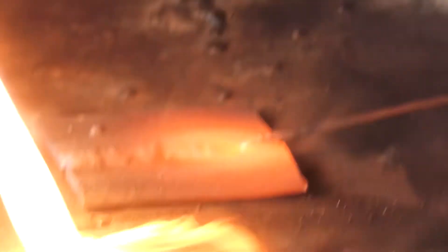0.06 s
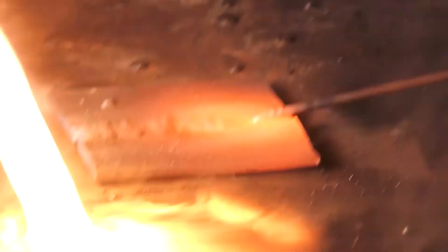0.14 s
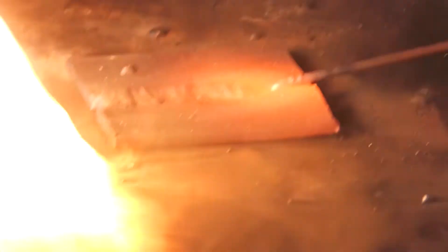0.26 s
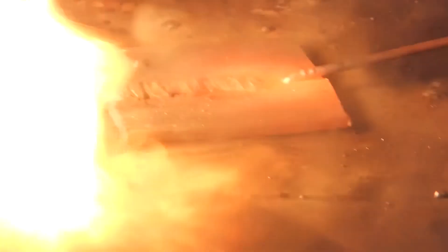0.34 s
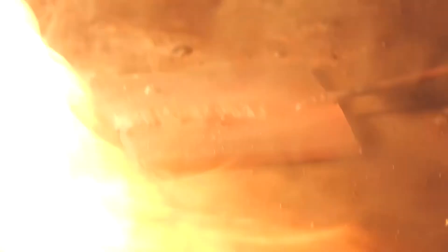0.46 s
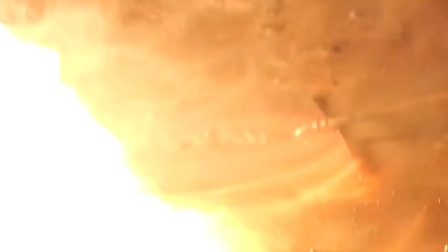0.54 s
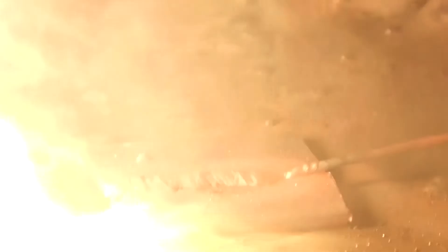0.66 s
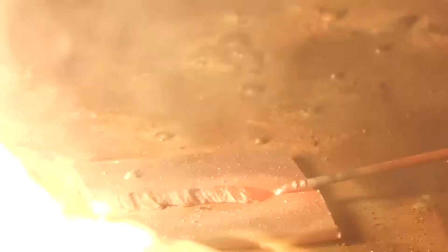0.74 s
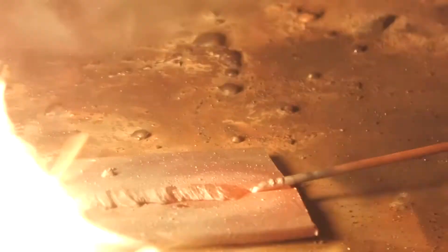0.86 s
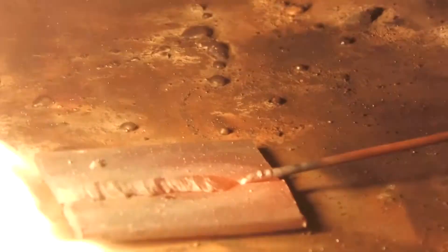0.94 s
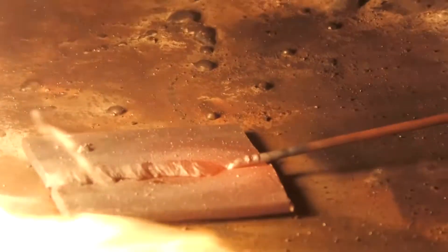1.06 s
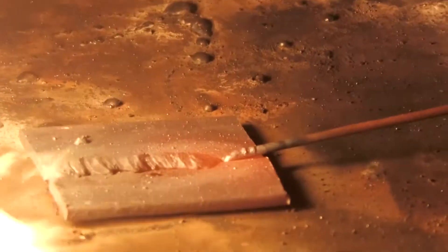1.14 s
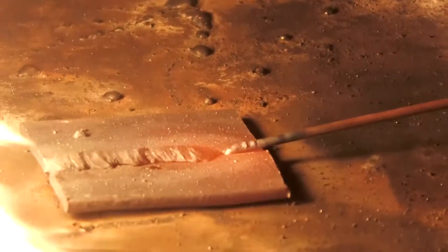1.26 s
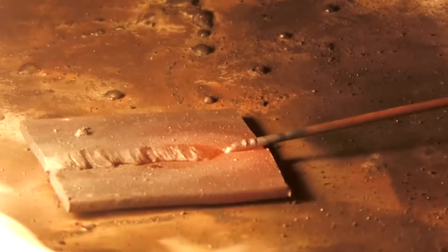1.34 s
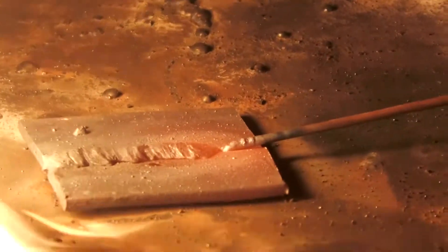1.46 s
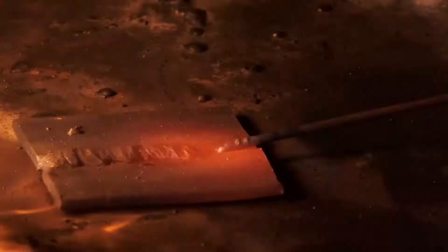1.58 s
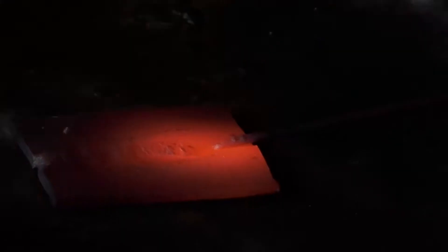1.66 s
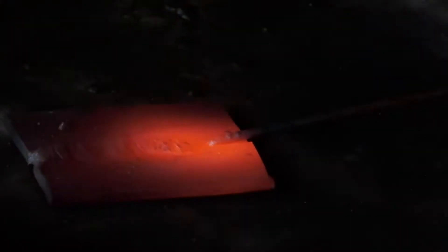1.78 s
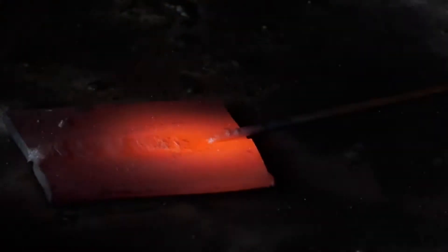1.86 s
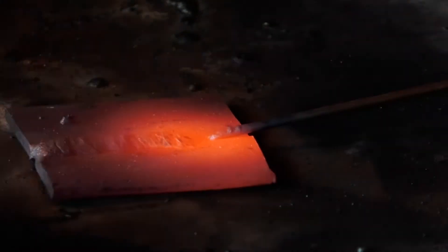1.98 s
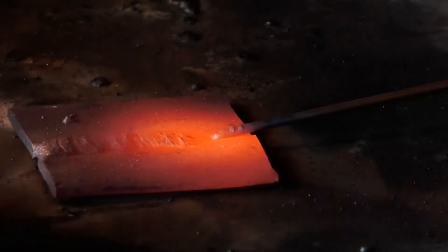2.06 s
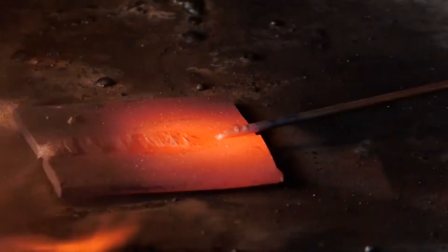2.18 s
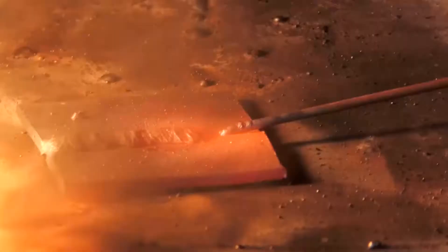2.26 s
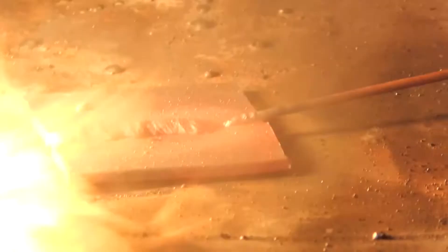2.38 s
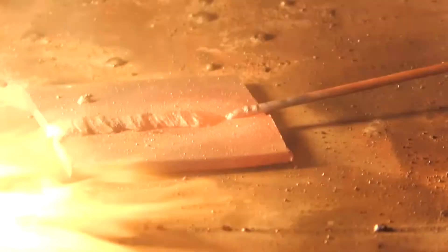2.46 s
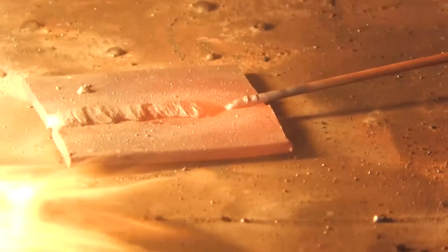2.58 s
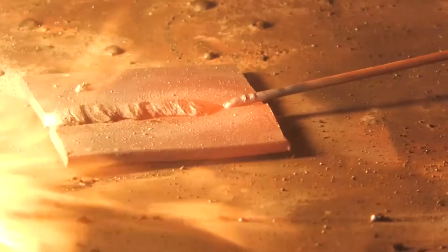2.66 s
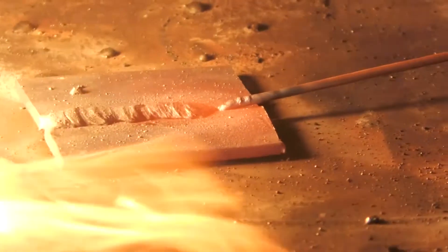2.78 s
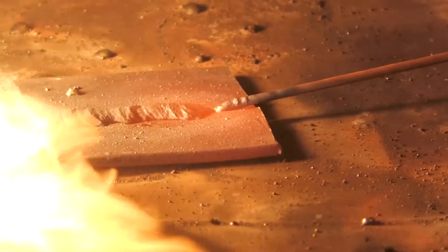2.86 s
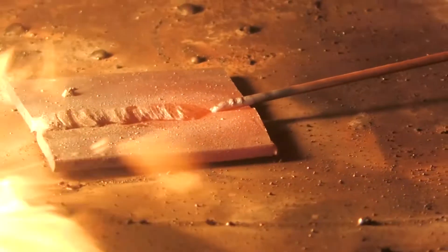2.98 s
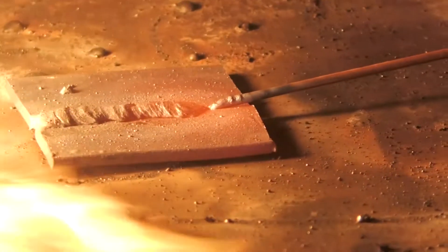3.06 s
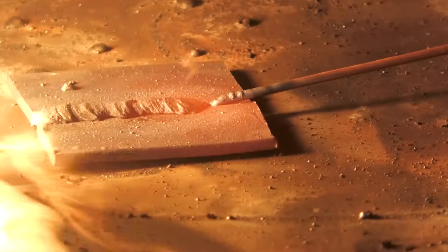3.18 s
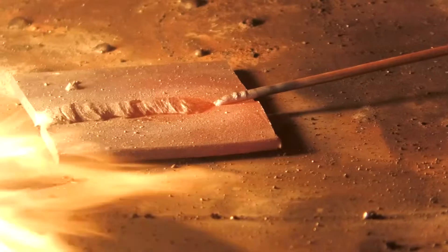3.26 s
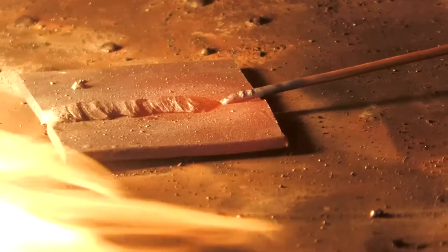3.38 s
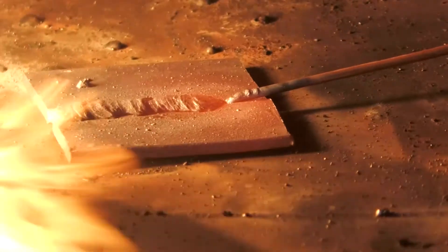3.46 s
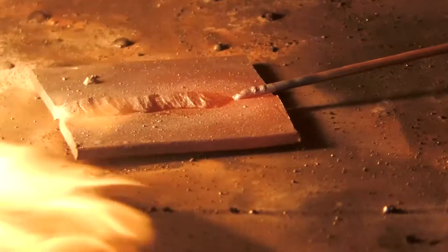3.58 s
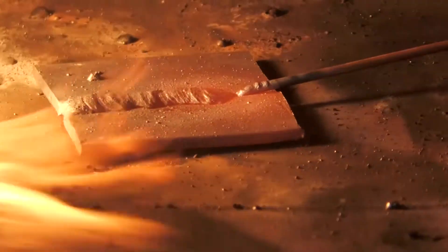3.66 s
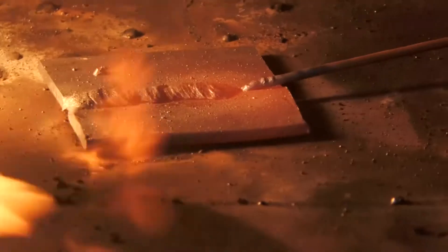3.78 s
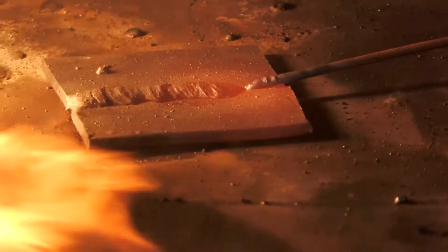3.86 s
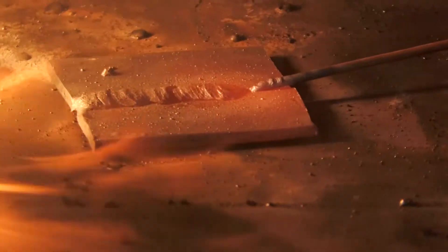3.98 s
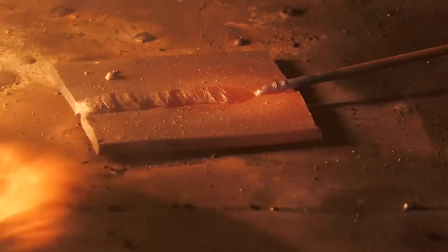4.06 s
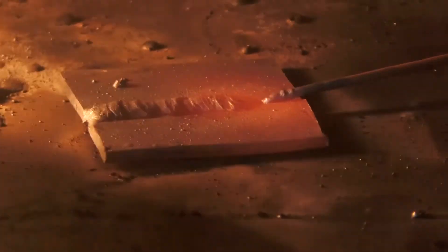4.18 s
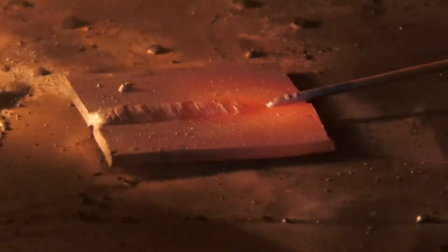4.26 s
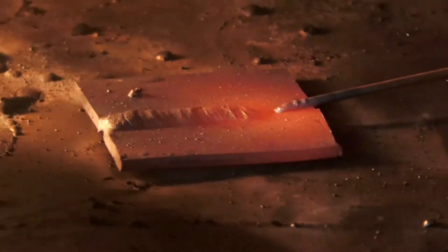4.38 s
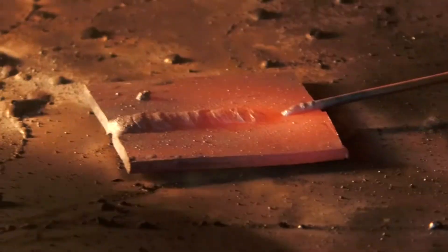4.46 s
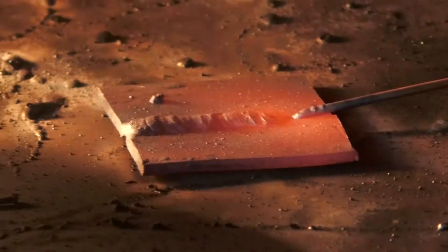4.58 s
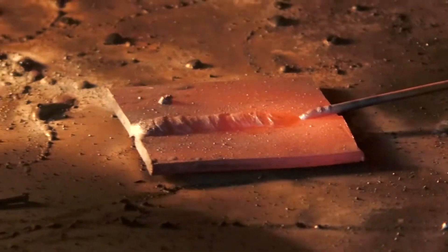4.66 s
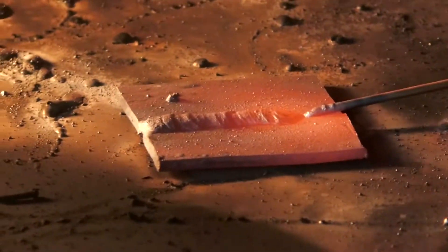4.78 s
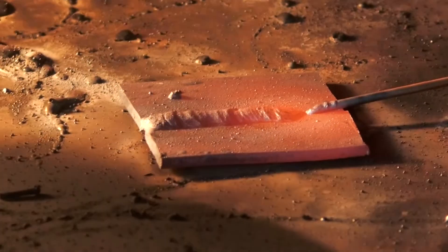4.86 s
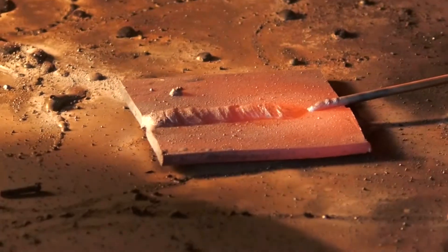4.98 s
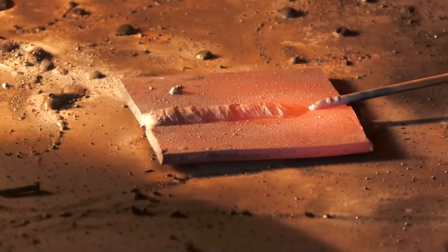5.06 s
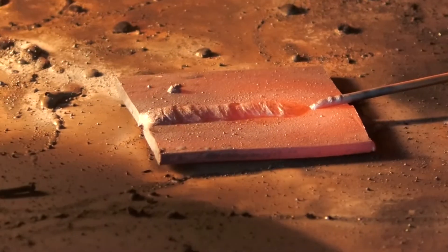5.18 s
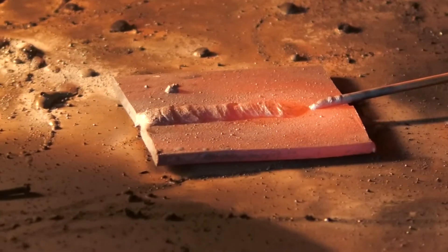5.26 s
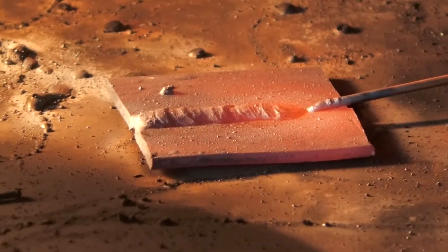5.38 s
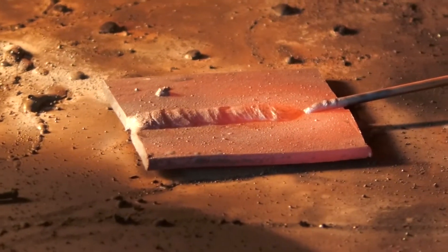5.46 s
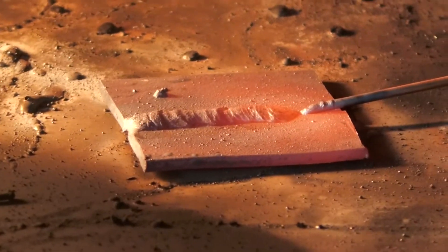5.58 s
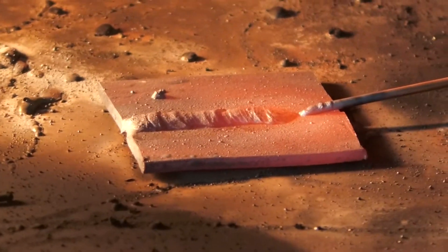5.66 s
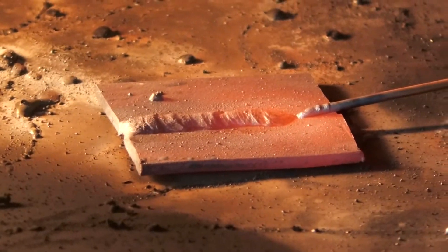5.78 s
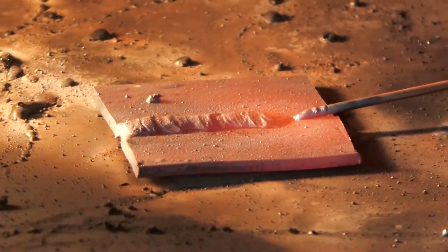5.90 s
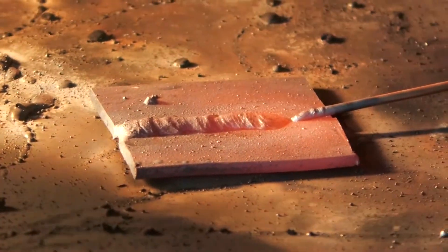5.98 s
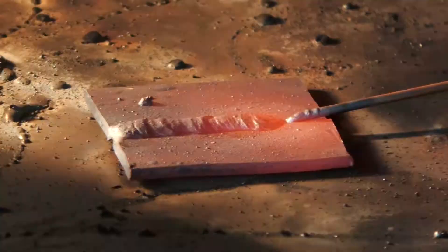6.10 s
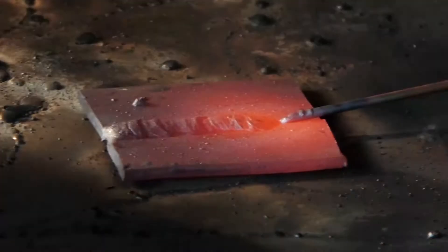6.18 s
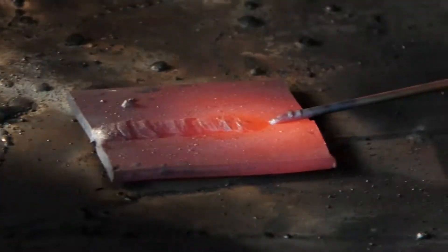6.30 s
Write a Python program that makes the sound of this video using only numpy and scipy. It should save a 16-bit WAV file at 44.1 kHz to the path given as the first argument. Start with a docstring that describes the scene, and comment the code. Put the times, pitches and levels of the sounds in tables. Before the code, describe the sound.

A welding torch is heard close up over a workbench, with only a very faint workshop murmur behind it. At first gas leaks with a soft, thin hiss. From about 0.5 to 0.7 seconds it catches with several quick pops and flares into a loud, fluttering roar with a strong hiss, briefly overloading the microphone. Around 1.6 seconds the valve is shut and the sound fades, nearly silent by 2.2 seconds. At about 2.4 seconds the torch relights with more pops and burns loudly and unevenly, with hollow puffs and a rasp. The flame eases a little toward 4 seconds, then surges once more at 4.5 seconds. Right after that the roar dies away as the flame tightens. A steady bright hiss remains, with a few faint flutters, growing slightly louder at 6 seconds and lasting to the end at about 6.3 seconds.

```python
"""Gas leaks softly from a welding torch, close by, over a small steel plate on a workbench.
The valve is opened, shut and opened again: eddies at the nozzle hiss, the gas catches with pops,
and a big yellow flame burns unevenly, roaring and fluttering. Oxygen draws it into a tight cone:
the roar dies and a steady bright hiss remains. The loudest stretches overload the microphone."""
import sys
import numpy as np
from scipy.fft import rfft, irfft, next_fast_len
from scipy.io import wavfile

SR = 44100
rng = np.random.default_rng(int(sys.argv[2]) if len(sys.argv) > 2 else 0)


def transcribe(u):
    """Save the signal u as a 16-bit wav file named by the first command-line argument.

    u: samples, shape (n,) or (channels, n), limited to [-1, 1]; the rate is SR.
    q: integer samples, one column per channel.
    """
    v = np.clip(np.atleast_2d(u).T, -1, 1)
    q = np.round(v * 32767).astype(np.int16)
    wavfile.write(sys.argv[1], SR, q)


N = 279153

# burning gas, one curve per burn: (time [s], roar [dB], rasp [dB])
FIRST_BURN = [(.38, -69, -102), (.54, -33.5, -42), (.63, -23.5, -28.5), (.68, -12.5, -17.5),
              (.73, -17, -18), (.87, -18, -23), (1.08, -21, -20), (1.52, -19, -19.5), (1.67, -30.5, -26),
              (1.9, -76, -45), (2.15, -71, -71)]
SECOND_BURN = [(2.29, -74.5, -74.5), (2.37, -43.5, -62), (2.46, -15.5, -23), (2.7, -16.5, -21),
               (2.92, -23, -25.5), (3.22, -20.5, -23), (3.75, -26, -27.5), (4.03, -28.5, -33),
               (4.38, -21, -35), (4.5, -15.5, -27.5), (4.65, -38, -43.5), (5.2, -51.5, -46),
               (6.33, -55.5, -59)]


def from_db(db):
    """Decibels to gain."""
    return 10 ** (np.asarray(db) / 20)


def rms_one(x):
    """Scale to unit power."""
    return x / np.sqrt(np.mean(x ** 2) + 1e-20)


def in_time(rows):
    """Each column of a time curve, per sample."""
    times_s, *columns = np.transpose(rows)
    return [np.interp(np.arange(N) / SR, times_s, column) for column in columns]


def bins_hz():
    """Frequencies of the filter grid."""
    size = next_fast_len(N, True)
    return np.arange(size // 2 + 1) * SR / size


def at_hz(points):
    """Table interpolated over log frequency onto the filter grid."""
    hz, value = np.transpose(points)
    return np.interp(np.log(bins_hz() + 1), np.log(hz), value)


def filtered(x, response):
    """Apply a frequency response."""
    size = next_fast_len(N, True)
    return irfft(rfft(x, size) * response, size)[..., :N]


def colour(points):
    """Gain of a spectrum table, falling 12 dB/octave beyond its ends."""
    hz = bins_hz() + 1
    low_skirt = np.minimum(1, hz / points[0][0]) ** 2
    high_skirt = np.minimum(1, points[-1][0] / hz) ** 2
    return from_db(at_hz(points)) * low_skirt * high_skirt


def resonance(hz, width_hz):
    """Response of one mode, peak gain 1."""
    f = bins_hz() + 1
    return 1 / (1 + 1j * (f * f - hz * hz) / (f * width_hz))


def below(hz):
    """Steep low-pass gain."""
    return 1 / np.sqrt(1 + (bins_hz() / hz) ** 16)


def above(hz):
    """Matching high-pass gain."""
    return np.sqrt(1 - below(hz) ** 2)


def drift(rate_hz):
    """Smooth random wander, rms 1."""
    return rms_one(filtered(rng.standard_normal(N), 1 / (1 + (bins_hz() / rate_hz) ** 2)))


def turbulence(response):
    """Coloured noise, partly alike at two microphones; rms 1."""
    # left-right likeness: (frequency [Hz], correlation [0-1])
    likeness = [(40, .6), (150, 0.7), (300, .82), (600, 0.92), (1100, .87), (2200, 0.9), (4000, .972),
                (6000, 0.99), (7800, 0.94), (9500, 0.58), (12000, .78)]
    alike = np.clip(at_hz(likeness), 0, 1)
    mid = filtered(rng.standard_normal(N), response * np.sqrt(1 + alike))
    side = filtered(rng.standard_normal(N), response * np.sqrt(1 - alike))
    return rms_one(mid + side * np.array([[1], [-1]]))


def reflections(t60_s, wet_db, count=40):
    """Response of bench, tools and walls: short echoes ripple the treble."""
    delays_s = rng.uniform(0.006, 0.07, count)
    taps = np.zeros(N)
    taps[(delays_s * SR).astype(int)] = from_db(-60 * delays_s / t60_s) * rng.choice([-1, 1], count)
    echoes = rfft(taps / np.sqrt(np.sum(taps ** 2)), next_fast_len(N, True))
    wet = from_db(wet_db) * bins_hz() / (bins_hz() + 900)   # small objects scatter only short waves
    return (1 + wet * echoes) / np.sqrt(1 + wet ** 2)


def workbench():
    """Response of the standing waves and echoes around plate and bench."""
    # standing waves: (frequency [Hz], width [Hz], lift [dB])
    modes = [(527, 25, -1), (775, 10, 3.5), (1450, 9.6, 3.5), (2400, 15, 3), (2520, 25, 4.5), (2787, 27, 1),
             (2995, 60, 2.5), (3800, 13, 3), (3870, 19, 2), (4450, 44, 1), (4890, 13, 1), (5240, 21, 1),
             (5459, 25, 0.5)]
    lift = sum((from_db(db) - 1) * resonance(hz, width_hz) for hz, width_hz, db in modes)
    return (1 + lift) * reflections(t60_s=0.14, wet_db=-4)


def seep(space, level_db=-50, fade_from_s=0.39, fade_db_per_s=65, airy_db=-45.5, airy_db_per_s=58):
    """The nearly shut valve hisses, with a faint high whistle and an airy lower one; all fade."""
    # leak spectrum: (frequency [Hz], density [dB])
    leak_spectrum = [(2800, -46.5), (3700, -19), (3900, -5.5), (4750, -8), (4900, -1), (5900, 3.5),
                     (6300, -3), (7600, -0.5), (8100, -9), (11500, -10), (13000, -28)]
    t = np.arange(N) / SR
    hiss = turbulence(colour(leak_spectrum) * space)
    high_whistle = turbulence(resonance(hz=11100, width_hz=150) ** 2) * from_db(-25)
    airy_whistle = turbulence(resonance(hz=5200, width_hz=600) ** 2)
    leak = from_db(level_db - fade_db_per_s * np.maximum(t - fade_from_s, 0))
    return (hiss + high_whistle) * leak + airy_whistle * from_db(airy_db - airy_db_per_s * t)


def shop(level_db=-66):
    """Faint, steady murmur of the workshop."""
    # room noise: (frequency [Hz], density [dB])
    room_spectrum = [(25, -13.5), (70, -2.5), (170, 2), (300, 3), (450, -2), (700, -14.5), (1100, -17.5),
                     (2000, -13.5), (8000, -30)]
    return turbulence(colour(room_spectrum)) * from_db(level_db)


def puffs(small_puffs, trim_db=-1, waver=0.07, ragged_db=1.94):
    """Each puff of the plume is a hollow, ragged note that swells and fades as its pitch wavers."""
    # big puffs of the loose flame: (time [s], pitch [Hz], level [dB], length [s])
    big_puffs = [(0.133, 257, -56, .04), (0.337, 170, -50.5, .055), (0.502, 282, -33, 0.048),
                 (0.621, 150, -25, .04), (0.679, 181.4, -16.5, 0.027), (0.711, 276.9, -22.5, 0.13),
                 (0.934, 275, -25.5, 0.065), (1.281, 151, -30.5, 0.048), (1.363, 154, -26, 0.036),
                 (1.604, 158.4, -31.5, .04), (1.668, 420, -31, .04), (2.3, 47.6, -47.5, .032),
                 (2.408, 275.6, -27, 0.046), (2.508, 277, -19, 0.075), (2.618, 203.4, -18, 0.038),
                 (2.69, 151.3, -27, .068), (3.242, 176, -27.5, 0.023), (3.394, 166, -30, 0.029),
                 (3.521, 416, -27, 0.05), (3.983, 81, -50, 0.048), (4.248, 180, -32, .032),
                 (4.935, 670, -42, .031), (5.088, 600, -39, 0.022), (5.229, 167, -41, 0.022),
                 (5.58, 581, -46, 0.039), (5.71, 315, -44, .032), (5.882, 165, -43, .045)]
    rows = big_puffs + small_puffs
    out, t = np.zeros(N), np.arange(N) / SR
    warped_s = np.cumsum(1 + waver * drift(30)) / SR
    ragged = from_db(ragged_db * drift(60))
    phases = rng.uniform(0, 2 * np.pi, len(rows))
    for (peak_s, hz, db, length_s), phase in zip(rows, phases):
        near = np.abs(t - peak_s) < 3 * length_s
        swell = np.exp(-np.abs((t[near] - peak_s) / (0.54 * length_s)) ** 1.08)
        note = np.sqrt(2) * np.sin(2 * np.pi * hz * warped_s[near] + phase)
        out[near] += from_db(db + trim_db) * swell * note
    return out * ragged


def flutters(roar_db, oxygen, per_s=11, pitch_hz=176, spread_octaves=0.13, length_s=0.05):
    """Small puffs leave the plume at a loose pace, scaled by the flame's size; rows for puffs()."""
    beats_s = np.arange(0, N / SR, 1 / per_s)
    late, detune, size = rng.standard_normal((len(beats_s), 3)).T
    times_s = beats_s + 0.25 * late / per_s
    at = np.clip(times_s * SR, 0, N - 1).astype(int)
    levels_db = roar_db[at] - 18.5 - 13.5 * oxygen[at] + 5 * size
    pitches_hz = pitch_hz * 2 ** (spread_octaves * detune)
    return [(s, hz, db, length_s) for s, hz, db in zip(times_s, pitches_hz, levels_db)]


def flame(space, unrest, oxygen, sputter_db=1.5, skirt_hz=760, narrowing_db=25, shrink_db=48):
    """Uneven burning roars, rasps and spits; the loose plume billows, the tight flame sputters."""
    # flame spectra: (frequency [Hz], density [dB])
    roar_spectrum = [(300, -35), (430, -31), (490, -9), (560, -5), (630, 2.5), (780, -2.5), (850, -9.5),
                     (935, -9), (985, -17), (1400, -49.5)]
    rasp_spectrum = [(1040, -21.5), (1180, -8.5), (1250, -4), (1550, -0.5), (1850, 0.5), (2300, -3),
                     (3500, -27.5)]
    spit_spectrum = [(7000, -12), (10000, 0), (12300, 1), (14000, -8), (16000, -10.5)]
    billow_spectrum = [(40, -25.5), (100, -38), (150, -8), (230, -34.5), (274, -10), (350, -21), (400, 3),
                       (560, 3.5), (900, -2), (1120, -2.5), (1300, -7), (2000, -38.5)]
    roar_db, rasp_db = in_time(FIRST_BURN + SECOND_BURN)
    surges_db = sputter_db * oxygen ** 2 * drift(12)
    lumps_db = drift(35) + surges_db
    broad = turbulence(colour(roar_spectrum) * space)
    hollow = filtered(broad, below(skirt_hz))
    skirt = (broad - hollow) * from_db(7.5 - narrowing_db * oxygen)   # oxygen hollows the roar
    roar = (hollow + skirt) * from_db(roar_db - 2.5 + lumps_db)
    rasp_shape = colour(rasp_spectrum) * space
    fine = turbulence(rasp_shape * above(1335)) * from_db(-1)
    # a small flame loses its coarse rasp and its spit
    coarse = turbulence(rasp_shape * below(1460)) * from_db(-1 + 0.5 * np.minimum(rasp_db + 22, 0))
    spit = turbulence(colour(spit_spectrum)) * from_db(-10 + 3 * np.minimum(rasp_db + 25, 0))
    rasp = (fine + coarse + spit) * from_db(rasp_db + 0.89 * unrest + 1.7 * surges_db)
    billow_db = roar_db - 1 - shrink_db * oxygen + 1.1 * lumps_db
    billow = turbulence(colour(billow_spectrum) * space) * from_db(billow_db)
    return roar + billow + rasp


def jet(space, unrest, oxygen, full_flow_db=-14, cone_from=0.64, open_s=0.45,
        edge_hz=2650, top_hz=7500, air_hz=10800):
    """Fine eddies at the nozzle hiss; a faster jet is brighter, and so is the tight cone."""
    # nozzle flow, one curve per valve opening: (time [s], hiss [dB])
    first_flow = [(.5, -49.5), (.68, -8.5), (.85, -12), (1.56, -10.5), (1.66, -17), (1.94, -32),
                  (2.13, -50), (2.28, -69.5)]
    second_flow = [(2.35, -68), (2.4, -36), (2.457, -12.5), (2.72, -11), (2.95, -13), (3.25, -10.5),
                   (3.52, -11.5), (4.0, -20.5), (4.28, -18.5), (4.43, -17.5), (4.51, -11), (4.62, -15.5),
                   (5.28, -15.5), (5.721, -13), (6.0, -14), (6.03, -10), (6.2, -9), (6.33, -10.5)]
    # nozzle hiss and low murmur of the steady flame: (frequency [Hz], density [dB])
    hiss_spectrum = [(1200, -33.5), (1860, -22.5), (1915, 0), (2400, -3), (3100, 2.5), (3900, 1.5),
                     (5500, 1), (6700, -1.5), (7700, -9), (9500, -11.5), (11800, -17), (13000, -36),
                     (16000, -56.5)]
    murmur_spectrum = [(30, -20.5), (90, -19), (160, -2), (280, -1), (450, 1.5), (900, -3.5), (1400, -11)]
    hiss_db, = in_time(first_flow + second_flow)
    slack_db = np.minimum(hiss_db - full_flow_db, 0)   # the finest eddies go first as the jet slows
    cone = np.clip((oxygen - cone_from) / (1 - cone_from), 0, 1)
    shape = colour(hiss_spectrum) * space
    low_edge = turbulence(shape * below(edge_hz)) * from_db(-6.5 - 7.5 * cone)
    core = turbulence(shape * above(edge_hz) * below(top_hz)) * from_db(0.5)
    top = turbulence(shape * above(top_hz) * below(air_hz)) * from_db(-10 + 0.89 * slack_db)
    air = turbulence(shape * above(air_hz)) * from_db(-23.5 + slack_db)
    treble = (top + air) * from_db(2 * cone + 0.46 * drift(7.8))
    murmur = turbulence(colour(murmur_spectrum)) * from_db(-40.5 + 1.6 * drift(12))
    flow = from_db(hiss_db + 0.5 * unrest + 0.4 * drift(5.5))
    opened = np.clip((np.arange(N) / SR - open_s) / 0.09, 0, 1)
    return (low_edge + core + treble + murmur) * flow * opened


def pops(waver=0.015, attack_s=0.002):
    """Pockets of gas catch at once and ring down."""
    # ignition pops: (time [s], pitch [Hz], level [dB], t60 [s])
    ignitions = [(.471, 287, -28, 0.23), (.535, 678, -20.5, 0.16), (.638, 572, -13, 0.069),
                 (.668, 529, -3, 0.11), (2.361, 680, -34, .08), (2.389, 610, -17.5, 0.11),
                 (2.446, 770, -22, 0.072)]
    out, t = np.zeros(N), np.arange(N) / SR
    warped_s = np.cumsum(1 + waver * drift(60)) / SR
    for start_s, hz, db, t60_s in ignitions:
        at = round(start_s * SR)
        age_s = t[at:] - t[at]
        attack = 1 - np.exp(-age_s / attack_s)
        decay = from_db(db - 60 * np.minimum(age_s / t60_s, 10))
        out[at:] += attack * decay * np.sin(2 * np.pi * hz * (warped_s[at:] - warped_s[at]))
    return out


def scene():
    """Valve, flame and jet share one spot above the bench; the shop murmurs far below their level."""
    # oxygen feed, tightening plume to cone: (time [s], share of final feed [0-1])
    oxygen_feed = [(2.7, 0), (3.05, 0.17), (3.55, 0.21), (3.8, 0.48), (4.5, 0.64), (4.9, 0.98)]
    # stereo balance: (frequency [Hz], left minus right [dB])
    balance = [(60, 4), (150, -3.5), (280, 3.5), (550, 0), (1100, 1.5), (2200, 1.2), (4400, 0.4), (6000, 0),
               (8000, 1), (12000, 1.1)]
    space = workbench()
    roar_db, _ = in_time(FIRST_BURN + SECOND_BURN)
    oxygen, = in_time(oxygen_feed)
    unrest = drift(25) * np.clip((roar_db + 49.5) / 28, 0.26, 1)   # a big flame shakes the jet more
    room = shop()
    torch = jet(space, unrest, oxygen) + flame(space, unrest, oxygen) + pops() + seep(space)
    plume = puffs(flutters(roar_db, oxygen))
    channel_db = at_hz(balance) * np.array([[0.5], [-0.5]])
    return filtered(torch + plume + room, from_db(channel_db))


def record(dry, ceiling=1.02, knee=13.0, cutoff_hz=15650):
    """Microphone overload flattens the peaks; a steep low-pass cuts the top."""
    clipped = dry / (1 + np.abs(dry / ceiling) ** knee) ** (1 / knee)
    return filtered(clipped, 1 / np.sqrt(1 + (bins_hz() / cutoff_hz) ** 200))


dry = scene()
out = record(dry)
transcribe(out)
```